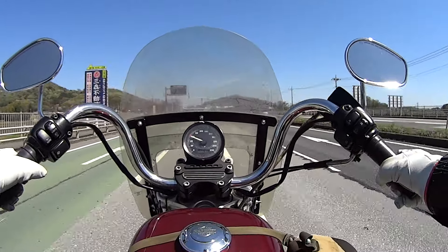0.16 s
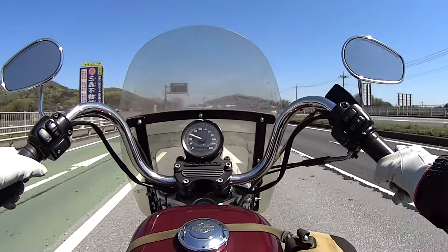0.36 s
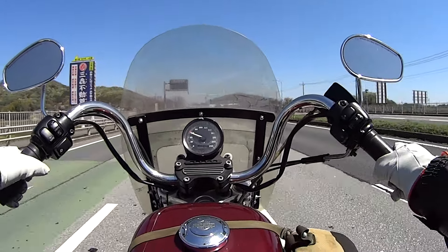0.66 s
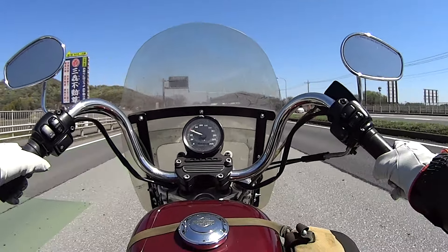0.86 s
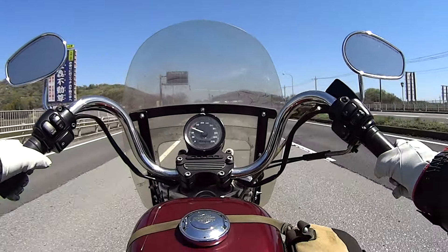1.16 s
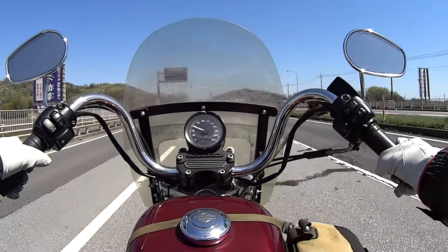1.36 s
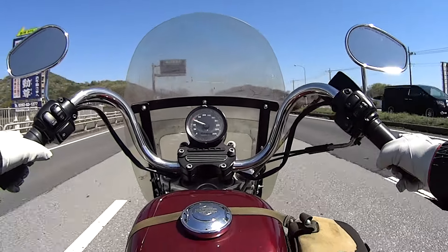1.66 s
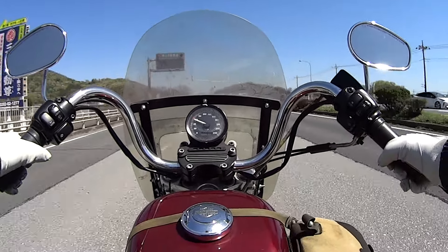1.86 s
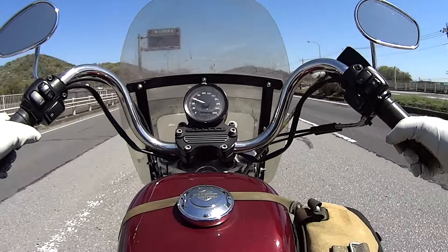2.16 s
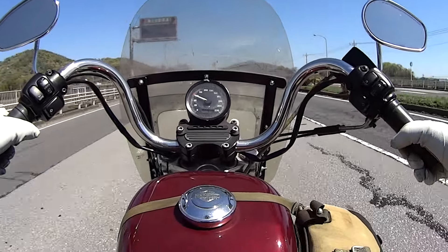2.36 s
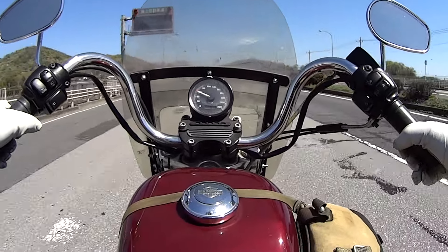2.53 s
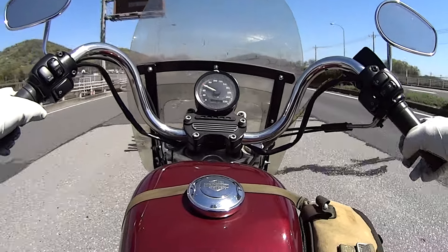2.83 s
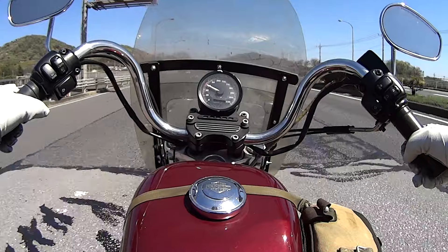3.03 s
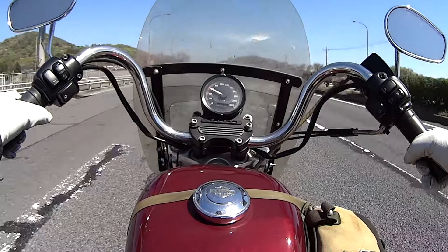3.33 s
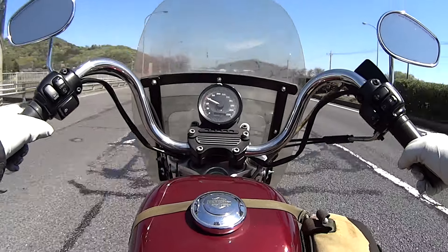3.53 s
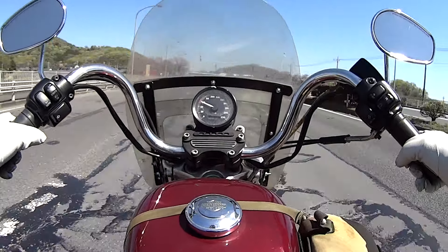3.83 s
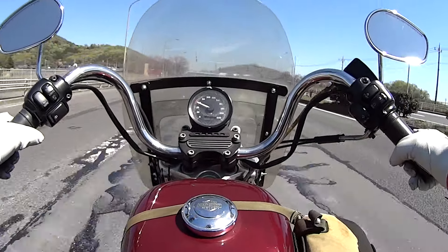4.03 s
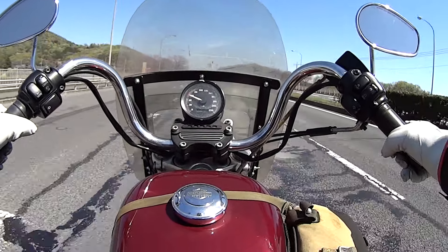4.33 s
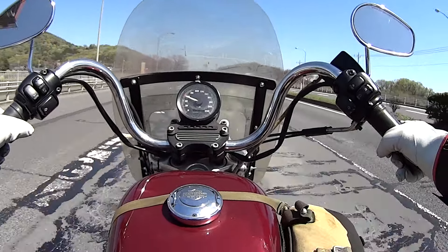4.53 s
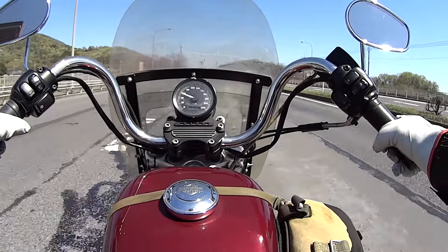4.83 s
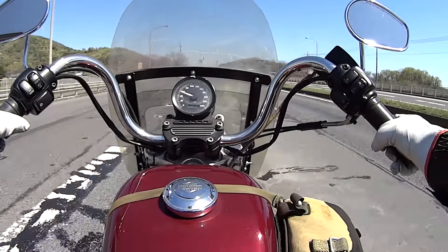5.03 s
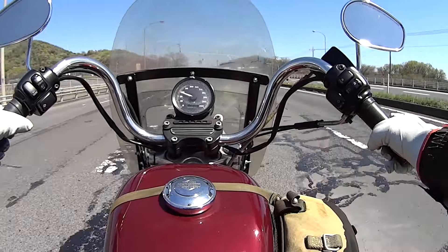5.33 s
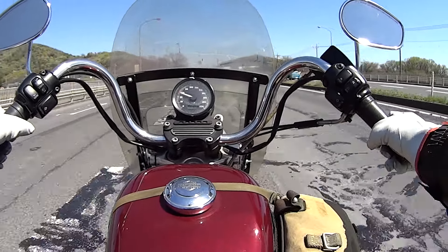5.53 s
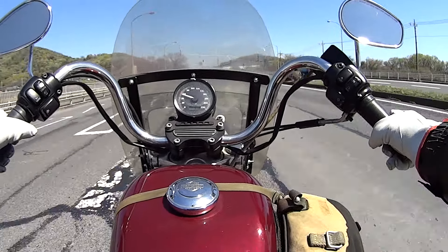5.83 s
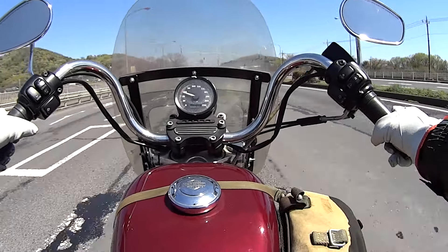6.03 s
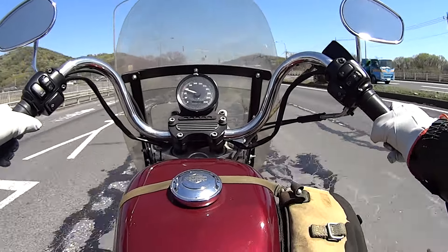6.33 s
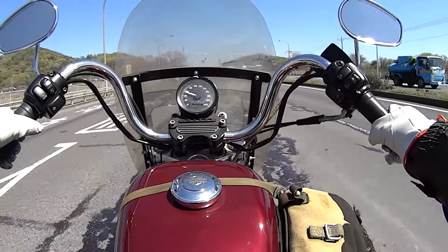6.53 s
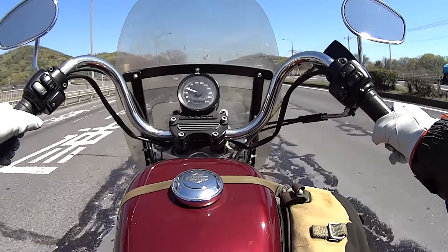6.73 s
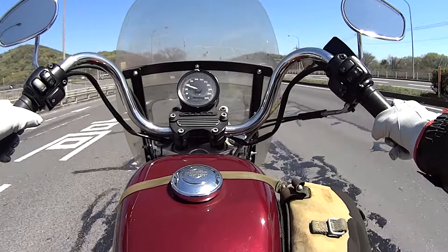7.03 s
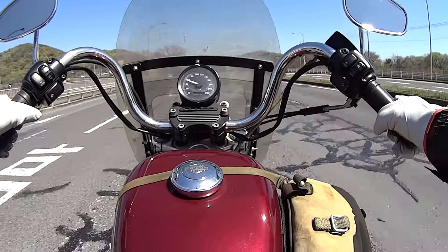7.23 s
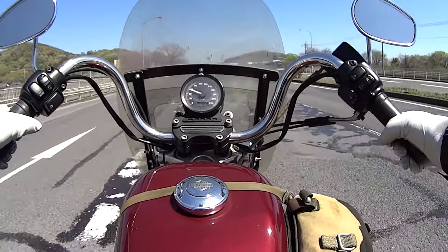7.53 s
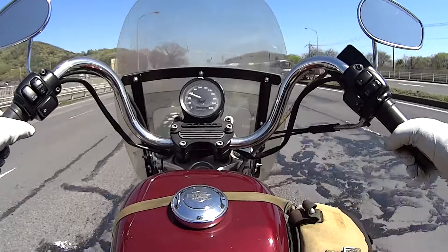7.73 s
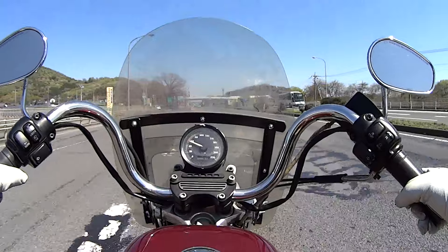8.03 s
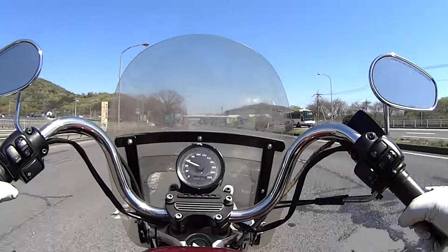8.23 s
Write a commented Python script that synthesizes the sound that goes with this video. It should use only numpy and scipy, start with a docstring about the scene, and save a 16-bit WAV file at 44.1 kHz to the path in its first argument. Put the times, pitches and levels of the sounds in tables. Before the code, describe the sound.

A V-twin motorcycle at road speed, heard close from the saddle outdoors, in wide stereo leaning left. From 0 to 2 s it pulls hard: deep, lopsided double gulps at roughly thirteen to fourteen cycles a second, with torn-air rasp and bright crackle, squashed by an overloaded microphone. Around 2 s the throttle closes with a small metallic chink. It coasts until about 4.1 s, exhaust puffs droning low, valve gear clattering and loose metal rattling faintly. A short gust and chink come near 3.85 s, another faint chink at 4.2 s. Uneven catching gulps begin the second, slower pull, which thickens to full, hollow, barking rasp by 6.4 s and holds, pitch creeping up. At about 7.6 s it shuts abruptly; gusts whoosh at 7.7 and, stronger, 8.2 s, where a gulp catches. Tyre and air rush with low buffeting persists throughout.

```python
"""A V-twin motorcycle at road speed, heard from the saddle, under a steady rush of tyres and air. It starts
under power: suction pulses ring the intake in a lopsided two-beat, with torn-air rasp and crackle. After two
seconds it coasts: exhaust puffs drone in the pipe, valve gear clatters and loose fittings chink. A brief hollow
swell of rush precedes a second, slower pull from four seconds; the throttle snaps shut near the end amid more
swells. Noise eddies buffet the microphone throughout, and a limiter ducks the loudest gulps."""
import sys
import numpy as np
from scipy import signal
from scipy.fft import rfft, irfft, next_fast_len
from scipy.io import wavfile
from scipy.ndimage import map_coordinates

SR = 44100
rng = np.random.default_rng(int(sys.argv[2]) if len(sys.argv) > 2 else 0)


def generate_wav(sig):
    """Save sig (samples, or channels by samples) to the path in sys.argv[1] as 16-bit PCM at SR."""
    pcm = np.round(np.clip(np.atleast_2d(sig).T, -1, 1) * 32767).astype(np.int16)
    wavfile.write(sys.argv[1], SR, pcm)


N = 369999


def amp(db):
    """Decibels to linear gain."""
    return 10 ** (np.asarray(db) / 20)


def unit(x):
    """x scaled to rms 1."""
    return x / np.sqrt(np.mean(x ** 2) + 1e-20)


def along(points, hz):
    """(Hz, value) points interpolated on a log frequency axis."""
    f, v = np.transpose(points)
    return np.interp(np.log(hz + 1), np.log(f + 1), v)


def curves(rows):
    """One value per sample for each column after the time."""
    s, *cols = np.transpose(rows)
    return [np.interp(np.arange(N) / SR, s, c) for c in cols]


def wobble(rate):
    """A smooth random curve, rate knots a second."""
    knots = rng.standard_normal(int(N * rate / SR) + 4)
    return map_coordinates(knots, [np.arange(N) * rate / SR])


def filtered(x, response):
    """x times a complex response of frequency."""
    m = next_fast_len(N + SR // 2)
    return irfft(rfft(x, m) * response(np.fft.rfftfreq(m, 1 / SR)), m)[..., :N]


def lagging(x, seconds):
    """x following with a first-order lag."""
    step = 1 - np.exp(-1 / (seconds * SR))
    return signal.lfilter([step], [1, step - 1], x)


def lean(db):
    """Left and right gains for a level difference, left minus right."""
    return amp(np.array([[1], [-1]]) * db / 2)


def sided(x, table):
    """x at rms 1, with a left-right level difference for each frequency."""
    return unit(filtered(x, lambda hz: lean(along(table, hz))))


def duct(x, table, size=16384):
    """x through a causal (minimum-phase) colour for each ear, so that resonances ring after the pulse."""
    hz, ears = np.fft.rfftfreq(size, 1 / SR), []
    for ear in (1, 2):
        level_db = along(np.array(table)[:, [0, ear]], hz)
        cepstrum = irfft(np.log(amp(level_db)))
        # folding the cepstrum forward in time makes the response causal
        cepstrum[1:size // 2] *= 2
        cepstrum[size // 2 + 1:] = 0
        ringing = irfft(np.exp(rfft(cepstrum)))
        ears.append(signal.fftconvolve(x, ringing)[:N])
    return np.array(ears)


def rush(spectrum, alike):
    """Coloured stereo noise of rms 1; mid and side are mixed to the left-right likeness."""
    turn = lambda hz: np.arccos(np.clip(along(alike, hz), -1, 1)) / 2
    colour = lambda hz: amp(along(spectrum, hz)) * [np.cos(turn(hz)), np.sin(turn(hz))]
    mid, side = filtered(rng.standard_normal((2, N)), colour)
    return unit(np.array([mid + side, mid - side]))


def beat(crank, place, length, scatter_db, jitter, count=140, order=2):
    """A pulse per cycle with random size and small random shift; bell-shaped, flatter at a higher order."""
    cycle = np.clip(np.round(crank - place).astype(int) + 2, 0, count - 1)
    size, shift = np.clip(rng.standard_normal((count, 2)), -2, 2)[cycle].T
    offset = (crank - place + .5) % 1 - .5 - jitter * shift  # in cycles
    return amp(scatter_db * size) * np.exp(-.5 * np.abs(offset / length) ** order)


# Twists of the throttle: open_start_s, wide_open_s, shut_s
PULLS = [(-.3, .38, 2.006), (4.09, 6.387, 7.62)]
EASE_S = .175  # the hand eases off slowly, then lets the grip snap shut


def twist_grip():
    """Throttle opening 0-1: each pull rolls on evenly, holds and shuts."""
    t = np.arange(N) / SR
    opening = 0
    for start, wide, shut in PULLS:
        roll_on = np.clip((t - start) / (wide - start), 0, 1)
        roll_off = 1 - np.exp(np.minimum(t - shut, 0) / EASE_S)
        opening = opening + roll_on * roll_off
    return opening


# Four-stroke cycles per second: at the start, and where it would settle with the throttle shut or wide open
START_RATE, SHUT_RATE, OPEN_RATE = 12.938, 9.94, 19.707
INERTIA_S, TORQUE_POWER = 5.433, 1.857  # how slowly the bike follows; drive grows as this power of the opening
START_PLACE = -.303  # where the engine is in its cycle at the start


def crankshaft(throttle):
    """Cycles turned so far: the speed creeps towards the one that the throttle can hold against drag."""
    goal = SHUT_RATE + (OPEN_RATE - SHUT_RATE) * throttle ** TORQUE_POWER
    step = 1 / (INERTIA_S * SR)
    rate = START_RATE + signal.lfilter([step], [1, step - 1], goal - START_RATE)
    return START_PLACE + np.cumsum(rate) / SR


THROTTLED_LAG, THROTTLED_BELOW = .032, .7  # most lateness in cycles; the opening below which gulps come late


def delayed(crank, throttle):
    """The cycle as the gulps follow it: later when the throttle is narrow."""
    return crank - THROTTLED_LAG * np.clip(1 - (throttle / THROTTLED_BELOW) ** 4, 0, 1)


# Uneven catching of the first cylinder: peak_s, extra_gulp_strength (0-1)
CATCHES = [(.098, .25), (4.268, .85), (4.424, .58), (4.658, .42), (4.817, .26), (4.894, .18), (4.974, .18),
           (5.21, .1), (7.62, .25), (8.196, .42)]


def catches():
    """Extra strength of the first cylinder's gulp where it catches."""
    t = np.arange(N) / SR
    return sum(extra * np.exp(-.5 * ((t - s) / .012) ** 2) for s, extra in CATCHES)


# Where the two intake strokes fall: first_place_cycles, second_place_cycles
INTAKE_PLACES = (-.021, .405)
# The two intake strokes: length_cycles, relative_suction_db, relative_tick_db (ticks sound in snaps)
INTAKE_STROKES = [(.019, 2.5, -1), (.022, 2.5, -14.5)]
# Pressure escaping as the first inlet valve opens: place_cycles, length_cycles, relative_level_db
BLOWBACK_PUSH = (-0.089, 0.013, -7.3)
# Intake tract and bodywork resonances: frequency_hz, relative_left_db, relative_right_db
INTAKE_TRACT = [(15, -8, -14.5), (28, -14, -18.5), (46, -19, -15), (66.3, -1, 0.5), (83.4, -6, 1),
                (102, 4, -1), (112.4, 2.5, 0.5), (139.7, 9, -5.5), (180, 6, -0.5), (236, 4.5, -2),
                (295, 7, -7), (329, 19.5, 9), (365, 13, -0.5), (440, 9.5, 0.5), (1210, -17, -30.5)]
MIDWAY_FILL = .33  # the first cylinder takes this much more than its share at half throttle


def intake(crank, throttle, gulp_db=4):
    """Each open inlet valve pulls a suction pulse that rings the tract; a short push leads the first."""
    fill = throttle * np.clip(throttle / .45, 0, 1)  # little air passes a barely open plate
    first = fill * (1 + MIDWAY_FILL * 4 * throttle * (1 - throttle)) + catches()
    gulps = 0
    for place, strength, (length, db, _) in zip(INTAKE_PLACES, (first, fill), INTAKE_STROKES):
        pulse = beat(delayed(crank, throttle), place, length, scatter_db=.4, jitter=.001)
        gulps = gulps + strength * amp(db) * pulse
    place, length, db = BLOWBACK_PUSH
    push = amp(db) * throttle ** 2 * beat(crank, place, length, scatter_db=-1.0, jitter=0.0032)
    return amp(gulp_db) * duct(push - gulps, INTAKE_TRACT)


def choke(throttle, crank, steep_db, knee=1.17, speed_power=3):
    """Gain of the tearing air: it grows with throttle opening and with engine speed."""
    rate = np.gradient(crank) * SR
    opening_gain = amp(-steep_db * np.clip(1 - throttle, 0, 1) ** knee)
    return throttle * opening_gain * (rate / rate.mean()) ** speed_power


# Air tearing past the plate, a row per cylinder:
# place_cycles, length_cycles, relative_level_db, closing_loss_db, relative_lead_hiss_db
RASP_BURSTS = [(-.06, 0.042, 10, 10.5, -16), (.372, 0.032, 11.5, 28, -10)]
# Air box resonances as each cylinder draws: frequency_hz, first_relative_db_per_hz, second_relative_db_per_hz
AIR_BOX = [(200, -17.5, -20), (447, 9, 4.5), (700, 11, 10), (900, 4, 5.5), (1130, -3.5, 5),
           (1260, -3.5, -10), (1520, -0.5, 0), (1860, -6, -11), (2030, -6, -6), (2580, -10, -12),
           (3300, -11.5, -11.5), (3440, -13.5, -15), (4250, -15.5, -17), (5350, -24.5, -26),
           (6340, -29, -29), (7300, -34, -34), (10500, -41, -38.5)]
# Stereo lean of the rasp: frequency_hz, left_minus_right_db
RASP_SIDES = [(500, 7), (1000, 6.5), (1350, 13), (1900, 4.5), (2500, 8.5), (3200, 8.5), (3700, 4.5),
              (4500, 7), (8000, 7.5)]


def rasp(crank, throttle, tear_db=-26, hiss_lead=.13, hiss_length=0.067, steady_db=-18,
         tail_db=-3, tail_s=0.004, ragged_db=2.5):
    """Air tears past the throttle plate at each stroke: a hiss, an abrupt ragged burst and a short tail."""
    sound = 0
    for column, (place, length, db, steep_db, hiss_db) in enumerate(RASP_BURSTS, 1):
        burst = beat(delayed(crank, throttle), place, length, scatter_db=2.2, jitter=.005, order=4)
        hiss = beat(crank, place - hiss_lead, hiss_length, scatter_db=2, jitter=.01)
        tail = amp(tail_db) * lagging(burst, tail_s)
        flow = burst + tail + amp(hiss_db) * hiss + amp(steady_db)
        colour = np.array(AIR_BOX)[:, [0, column]]
        air = sided(rush(colour, [(500, 0.76), (3000, 0.39), (8000, 0.14)]), RASP_SIDES)
        level = amp(tear_db + db + ragged_db * wobble(700))
        sound = sound + level * choke(throttle, crank, steep_db) * flow * air
    return sound / 2


def snaps(crank, throttle, snap_db=-39, length=0.012, lead=.004, tail_db=-2, tail_s=0.0017,
          sets_in=0.34, catch_share=0.41):
    """Bright crackle near each gulp's peak, above a third throttle and wherever the first cylinder catches."""
    late = delayed(crank, throttle)
    ticks = 0
    for place, (_, _, db) in zip(INTAKE_PLACES, INTAKE_STROKES):
        ticks = ticks + amp(db) * beat(late, place - lead, length, scatter_db=1.2, jitter=.003)
    ticks = ticks + amp(tail_db) * lagging(ticks, tail_s)
    # (Hz, relative dB per Hz)
    colour = [(800, -12), (2000, 1.5), (2900, 16.5), (3600, 2), (4400, -2), (5400, -7.5), (7000, -10), (10500, -9)]
    crackle = rush(colour, [(3000, 1.0)])
    strength = np.clip(4 * (throttle - sets_in), 0, 1) + catch_share * catches()
    return amp(snap_db) * strength * ticks * crackle * lean(db=6.5)


def bark(crank, throttle, bark_db=-26.5, bark_hz=1120, lead=0.042, length=0.026):
    """At wide throttle the second inlet valve cracks open with hollow, ragged cycles ahead of its gulp."""
    cracks = beat(crank, INTAKE_PLACES[1] - lead, length, scatter_db=2, jitter=0.004, order=4)
    phase = 2 * np.pi * bark_hz * np.arange(N) / SR
    hollow = unit(np.sin(phase + .9 * wobble(750)))
    return amp(bark_db) * choke(throttle, crank, steep_db=25.5) * cracks * hollow * lean(db=16)


# The two exhaust puffs: place_cycles, relative_level_db
EXHAUST_PUFFS = [(0.071, 6.5), (0.51, 4.5)]
# Exhaust pipe and silencer: frequency_hz, relative_left_db, relative_right_db
EXHAUST_PIPE = [(20, -23, -24), (28, -15.5, -19.5), (46, -13.5, -9.5), (60.4, 2, -3), (72, -21.5, -9),
                (96.3, -2, -1.5), (110, -13.5, -20.5), (151, 5, -12.5), (186, -7.5, -17), (236, -17, -22.5),
                (318, -14.5, -23), (450, -8.5, -18.5), (1200, -13, -21.5)]


def exhaust(crank, throttle, drone_db=-1, pulling_db=-26):
    """Uneven puffs boom in the pipe; the drone stands out when the throttle is shut."""
    puffs = 0
    for place, db in EXHAUST_PUFFS:
        puffs = puffs + amp(db) * beat(crank, place, length=0.015, scatter_db=0.76, jitter=0.0025)
    return duct(puffs * amp(drone_db + pulling_db * throttle ** 3), EXHAUST_PIPE)


# Tappets and valve seats: place_cycles, relative_level_db
VALVE_KNOCKS = [(.06, 3.5), (0.198, -1.5), (.3, 4.5), (.5, -1.5), (.63, -8), (0.792, 5)]
# Cylinder heads and cases: resonance_hz, width_hz, relative_level_db
CYLINDER_HEADS = [(610, 130, 4), (1050, 130, -11), (1970, 470, -19.5)]


def valve_gear(crank, clatter_db=-37):
    """Tappets and valve seats knock the resonant cylinder heads in step with the camshaft."""
    knocks = 0
    for place, db in VALVE_KNOCKS:
        knocks = knocks + amp(db) * beat(crank, place, length=.0015, scatter_db=1.5, jitter=.003)
    resonance = lambda f, c, w: 1j * f * w / (c * c - f * f + 1j * f * w)
    heads = lambda f: sum(amp(db) * resonance(f, c, w) for c, w, db in CYLINDER_HEADS)
    return amp(clatter_db) * unit(filtered(knocks, heads)) * lean(db=1.5)


def rattle(rattle_db=-42, per_second=70, spread_db=3):
    """Chain and loose metal rattle in small random taps that ring the metal."""
    chance, size = rng.random(N), np.clip(rng.standard_normal(N), -2, 2)
    taps = (chance < per_second / SR) * amp(spread_db * size)
    # (Hz, relative left dB, relative right dB)
    metal = [(450, -36, -40), (696, 5.5, -6), (880, -2.5, -8.5), (1085, 9, -3.5), (1390, -10, -22.5),
             (2060, -6, -13.5), (2500, -23, -27.5), (4540, -26.5, -31.5), (6060, -47.5, -49)]
    return amp(rattle_db) * unit(duct(taps, metal))


# Level of the rush of tyres and air: time_s, relative_level_db
RUSH_LEVEL = [(0.0, -28), (2.17, -30.5), (3.52, -28), (4.1, -30.5), (4.37, -27), (6.03, -30), (6.34, -29),
              (7.71, -29.5), (8.05, -31.5)]
# Tyres and air: frequency_hz, relative_db_per_hz
ROAD_COLOUR = [(200, -16), (400, -4.5), (520, -4.5), (640, 1), (800, -1.16), (1150, -9.5), (1350, -19),
               (2150, -23), (2550, -31.5), (4600, -38.5), (5500, -47.5), (7500, -54), (10800, -58)]
# Left-right likeness of road and swells: frequency_hz, likeness (1 = identical)
ROAD_LIKENESS = [(200, 0.58), (600, 1), (1200, 0.07), (3000, 0.25), (8000, .1)]
# Stereo lean of road, eddies and swells: frequency_hz, left_minus_right_db
ROAD_SIDES = [(60, 0), (96, 5.5), (150, 0), (250, 14.5), (390, 5.5), (630, 9.5), (1000, 6.5), (1450, 13.5),
              (2050, 3.5), (2700, 11), (4100, 5.5)]
# Wind eddies: frequency_hz, relative_db_per_hz
BUFFET_COLOUR = [(10, -6.5), (22, 3), (42, -3.5), (70, -3), (110, -12), (160, -5.5), (200, -9.5),
                 (245, -22.5), (320, -14), (420, -21), (800, -43.5), (2000, -120)]


def slipstream(road_db=2.0, buffet_db=-17, lumps_db=1.1, buffet_follows=0.5, flutter_db=1.42):
    """Tyres and air rush on; eddies off the windscreen thump each microphone port, the left one more."""
    air_db, = curves(RUSH_LEVEL)
    road = sided(rush(ROAD_COLOUR, ROAD_LIKENESS), ROAD_SIDES) * amp(flutter_db * wobble(22))
    lumps = amp(lumps_db * np.array([wobble(10), wobble(34)]))  # each ear swells on its own
    eddies = sided(rush(BUFFET_COLOUR, [(30, -0.7), (150, 0.27)]) * lumps, ROAD_SIDES)
    eddies_db = buffet_db + buffet_follows * (air_db - air_db.mean())
    return amp(air_db + road_db) * road + amp(eddies_db) * eddies


# Loose fittings chink as the drive goes slack and over rough asphalt:
# peak_s, relative_level_db, pitch_hz, width_hz, length_s
FITTING_JOLTS = [(2.025, -51, 4140, 800, 0.0086), (3.84, -50, 2900, 1100, 0.013),
                 (4.223, -56, 4400, 600, .008)]


def jolts():
    """Fittings chink when the bike is jolted: short bursts of band-limited noise."""
    t = np.arange(N) / SR
    chinks = 0
    for s, db, hz, width, length in FITTING_JOLTS:
        band = lambda f: 1 / (1 + ((f - hz) / width) ** 4)
        metal = unit(filtered(rng.standard_normal((2, N)), band))
        chinks = chinks + amp(db) * np.exp(-.5 * ((t - s) / length) ** 2) * metal
    return chinks * lean(db=7.5)


# Short hollow swells of the rush: peak_s, level_db, length_s
RUSH_SWELLS = [(3.852, -34, 0.05), (7.664, -28, 0.065), (8.175, -23, 0.057)]
# Hollow colour of the swells: frequency_hz, relative_db_per_hz
SWELL_WHOOSH = [(300, -27), (550, -8.5), (750, 1), (1100, -10), (1400, -19), (2500, -31), (5000, -51.5),
                (10000, -84)]


def swells():
    """The rush swells briefly with a hollow whoosh of coloured noise."""
    t = np.arange(N) / SR
    swell = sum(amp(db) * np.exp(-.5 * ((t - s) / length) ** 2) for s, db, length in RUSH_SWELLS)
    return swell * sided(rush(SWELL_WHOOSH, ROAD_LIKENESS), ROAD_SIDES)


def scene(build_s=0.055):
    """The hand sets the throttle, the throttle sets the speed, and they drive the engine's sounds."""
    throttle = twist_grip()
    crank = crankshaft(throttle)
    # the tearing air takes a moment to build, but the closing plate cuts it at once
    stream = np.minimum(throttle, lagging(throttle, build_s))
    inlet = intake(crank, throttle) + rasp(crank, stream) + snaps(crank, stream) + bark(crank, stream)
    engine = inlet + exhaust(crank, throttle) + valve_gear(crank) + rattle()
    return engine + slipstream() + jolts() + swells()


TOP_HZ = 11050  # upper edge of the sound


def record(dry, threshold=0.37, ducking=160, recovery=0.006, slow_ducking=9, slow_recovery=0.12, hardness=8):
    """Overloads charge a limiter: a fast stage ducks loud gulps, a slow one holds on; the tips flatten."""
    ceiling = .97
    sound = filtered(dry, lambda hz: 1j * hz / (8 + 1j * hz))  # 8 Hz low cut
    overload = np.maximum(np.maximum(np.abs(sound[0]), np.abs(sound[1])) - threshold, 0)
    t = np.arange(SR) / SR
    memory = ducking * np.exp(-t / recovery) + slow_ducking * np.exp(-t / slow_recovery)  # recoveries in s
    ducked = sound / (1 + signal.fftconvolve(overload, memory)[:N] / SR)
    squashed = ducked / (1 + np.abs(ducked / ceiling) ** hardness) ** (1 / hardness)
    ends = np.interp(np.arange(N), [0, 60, N - 60, N - 1], [0, 1, 1, 0])  # brief fades, in samples
    return filtered(squashed * ends, lambda hz: 1 / (1 + (hz / TOP_HZ) ** 120))


dry = scene()
out = record(dry)
generate_wav(out)
```